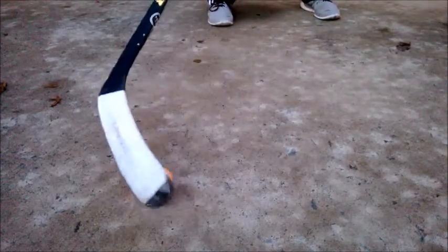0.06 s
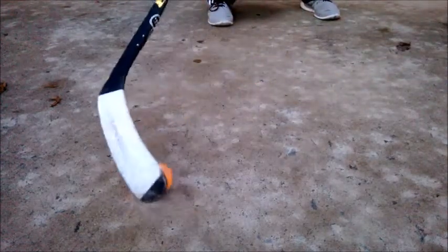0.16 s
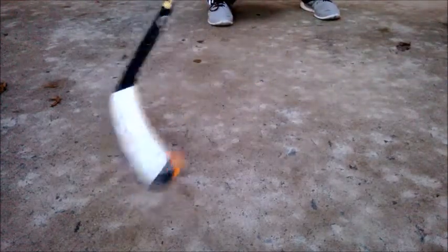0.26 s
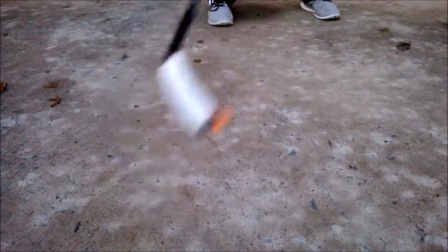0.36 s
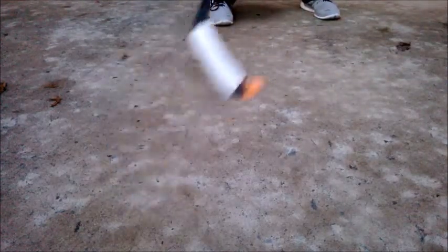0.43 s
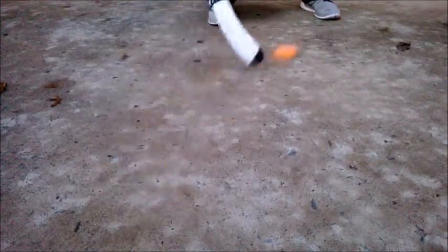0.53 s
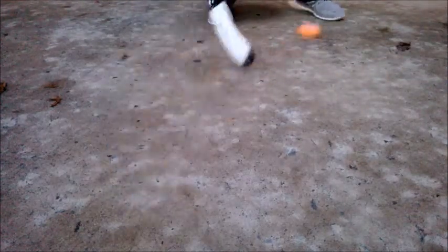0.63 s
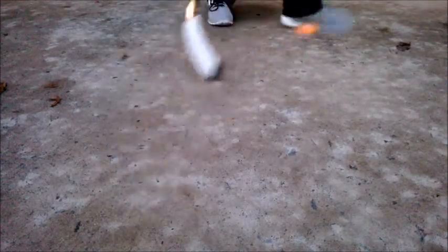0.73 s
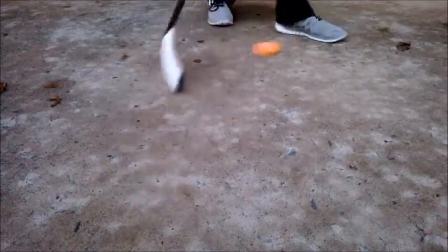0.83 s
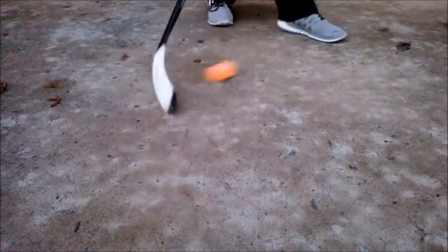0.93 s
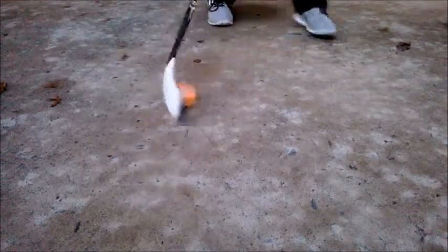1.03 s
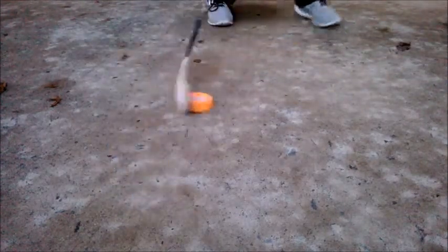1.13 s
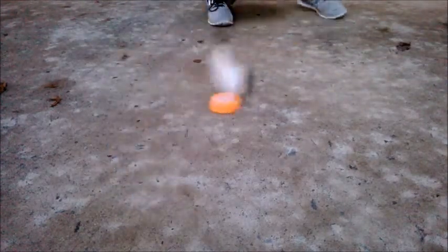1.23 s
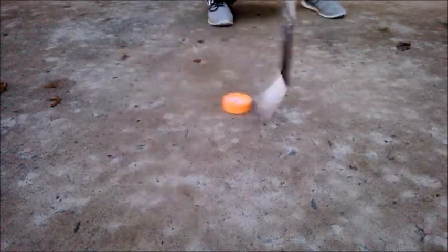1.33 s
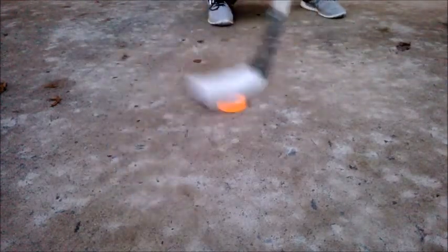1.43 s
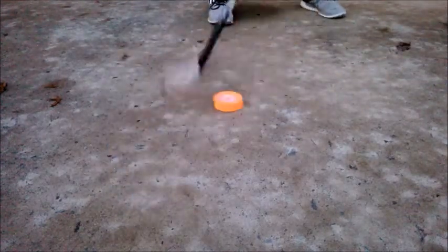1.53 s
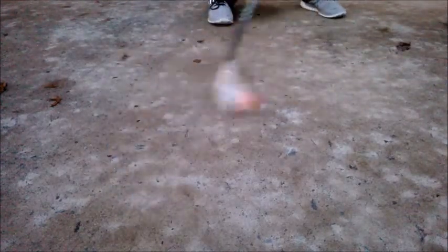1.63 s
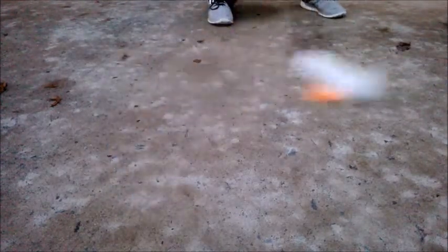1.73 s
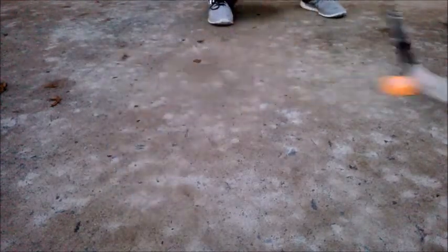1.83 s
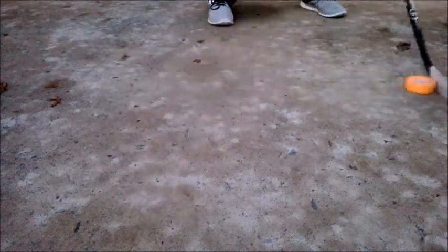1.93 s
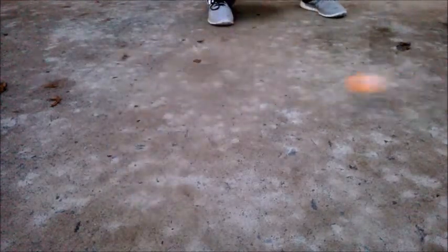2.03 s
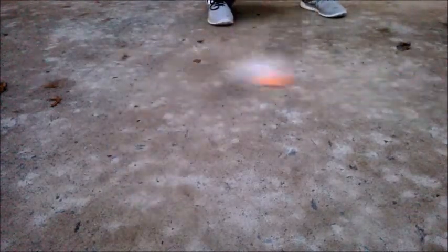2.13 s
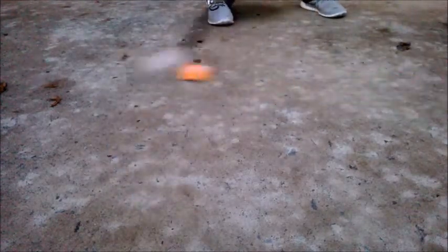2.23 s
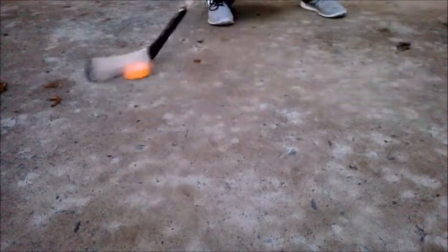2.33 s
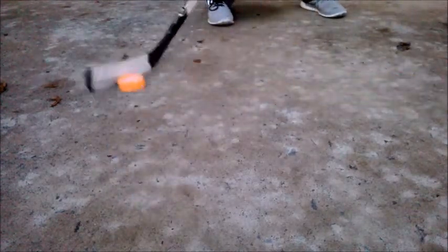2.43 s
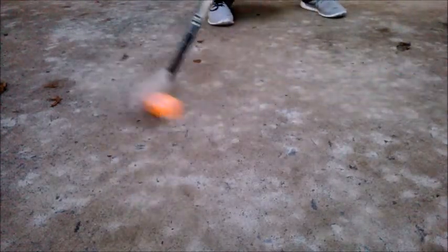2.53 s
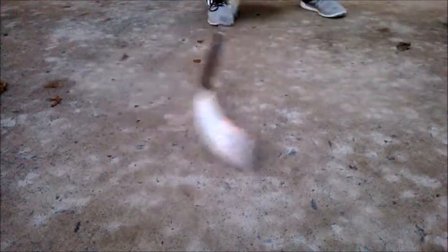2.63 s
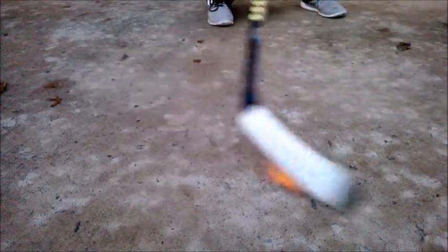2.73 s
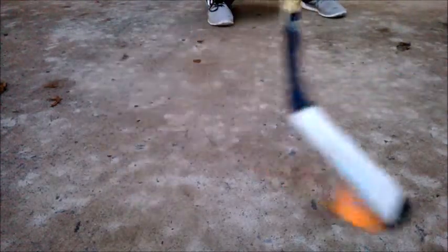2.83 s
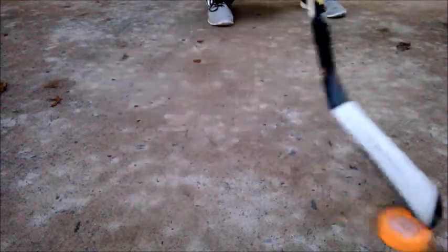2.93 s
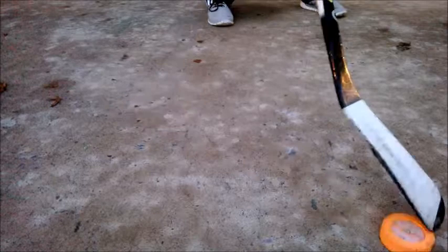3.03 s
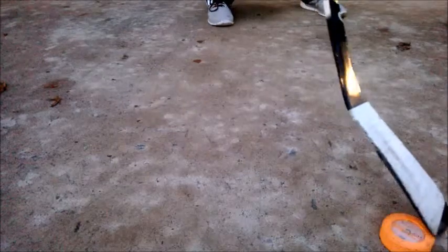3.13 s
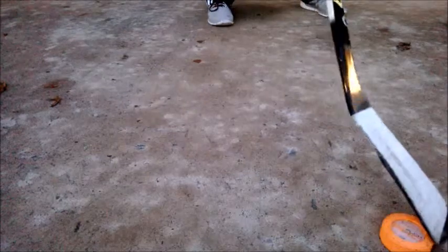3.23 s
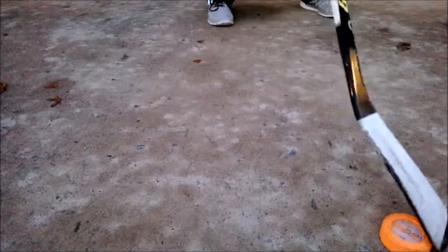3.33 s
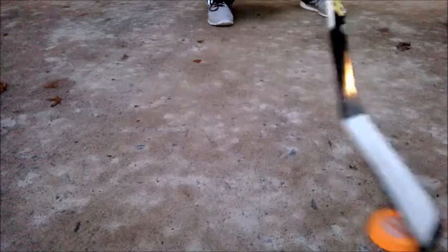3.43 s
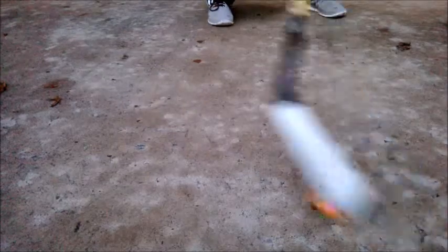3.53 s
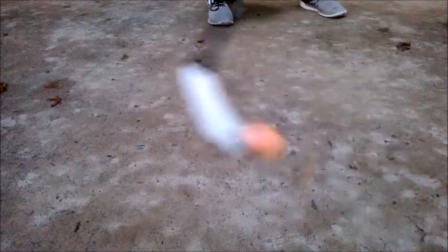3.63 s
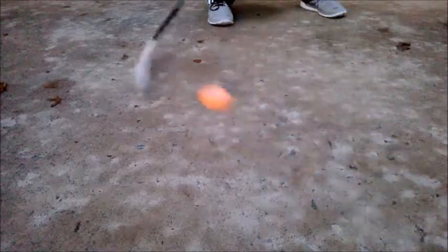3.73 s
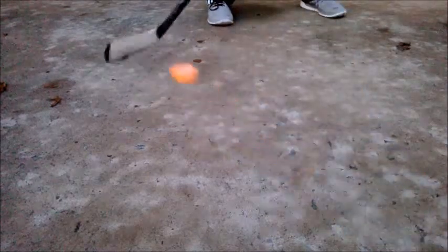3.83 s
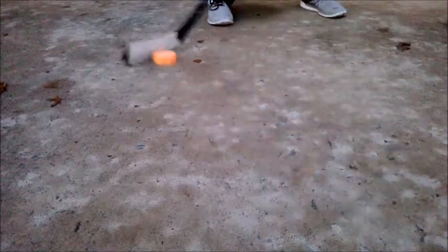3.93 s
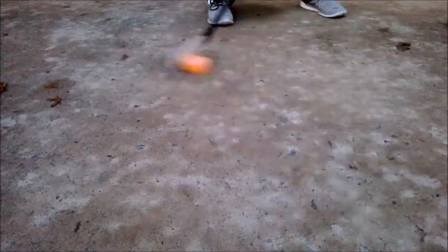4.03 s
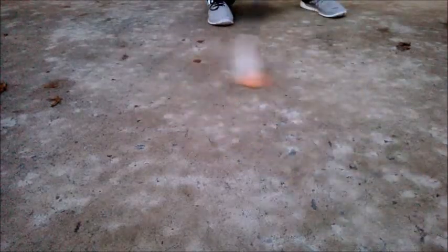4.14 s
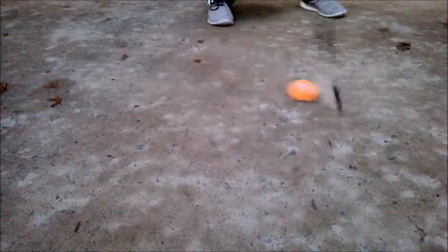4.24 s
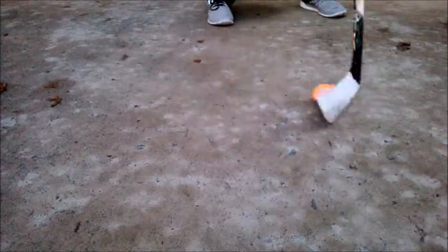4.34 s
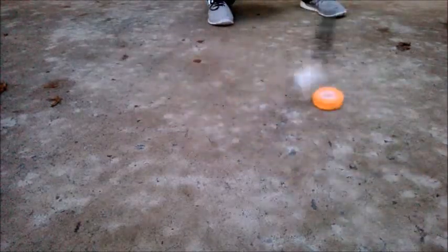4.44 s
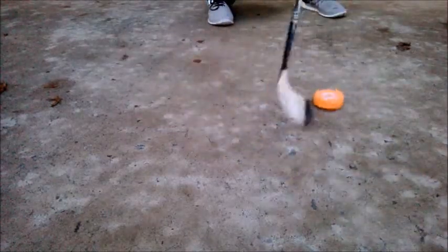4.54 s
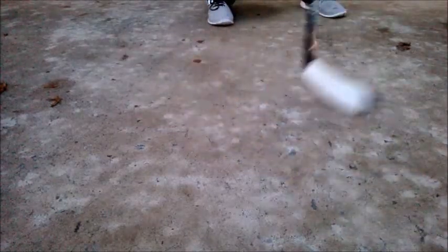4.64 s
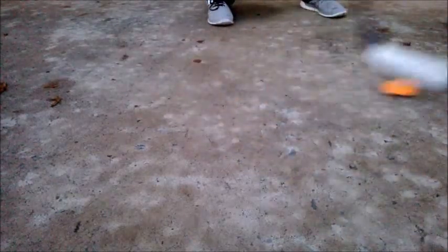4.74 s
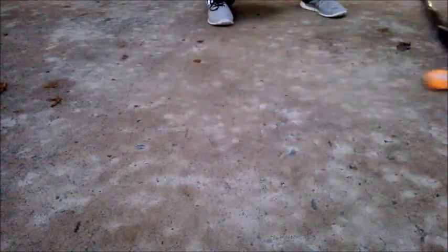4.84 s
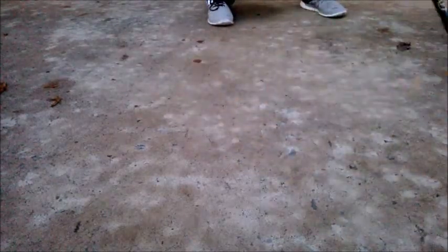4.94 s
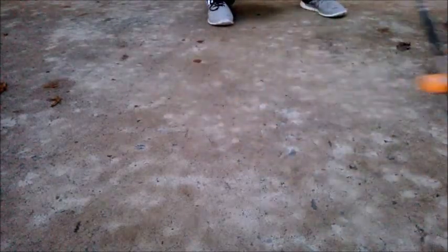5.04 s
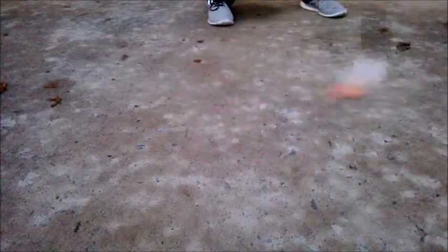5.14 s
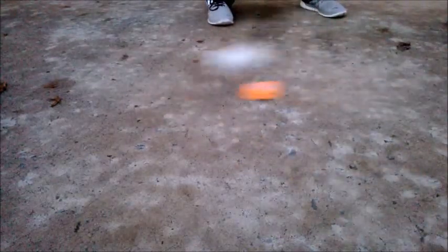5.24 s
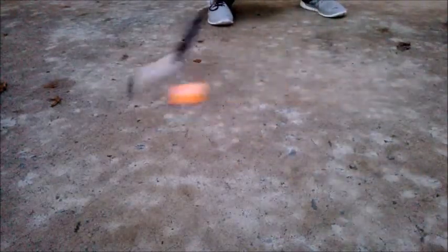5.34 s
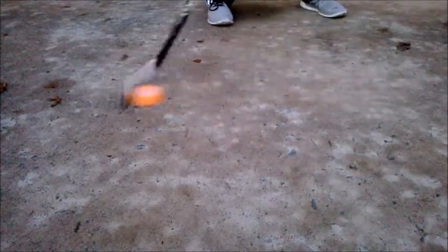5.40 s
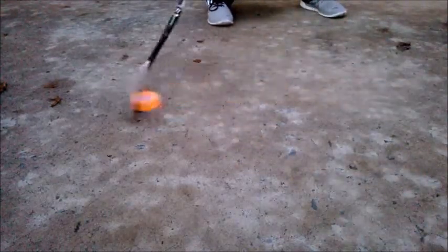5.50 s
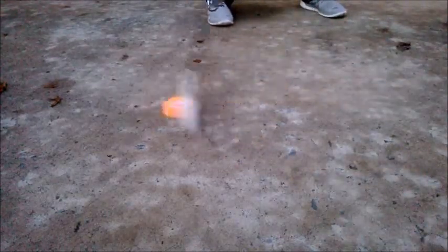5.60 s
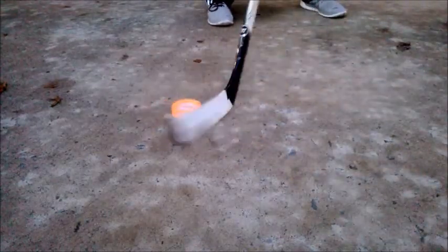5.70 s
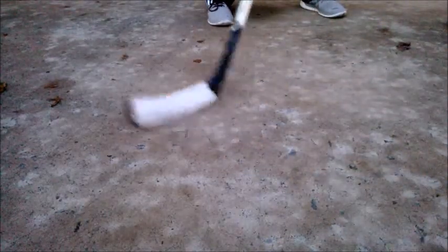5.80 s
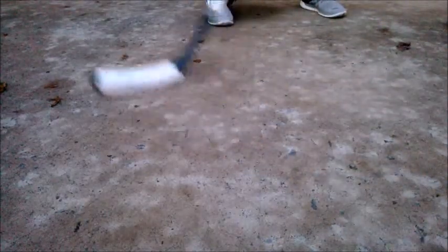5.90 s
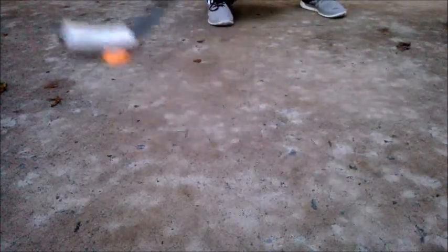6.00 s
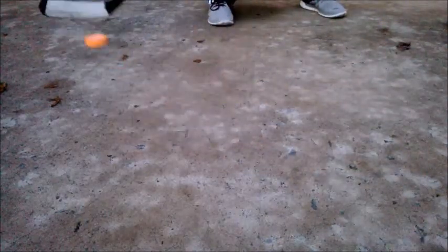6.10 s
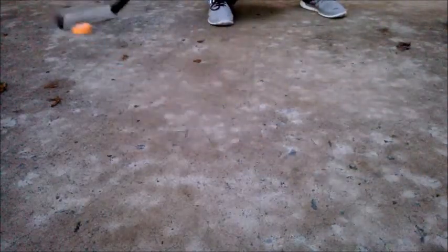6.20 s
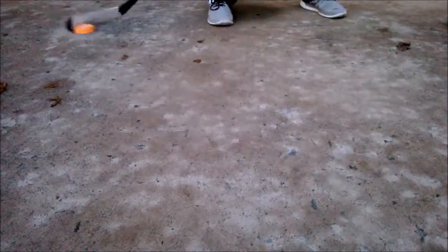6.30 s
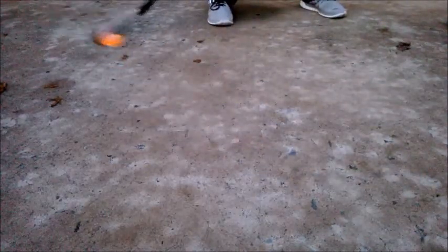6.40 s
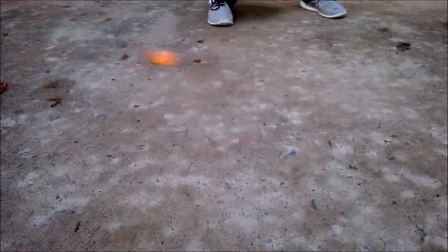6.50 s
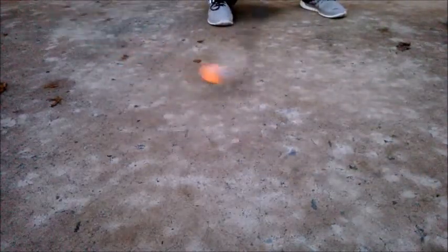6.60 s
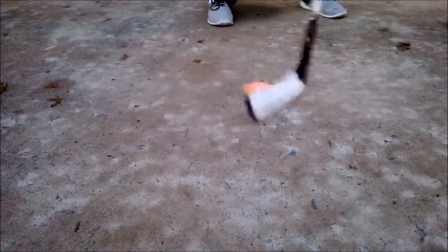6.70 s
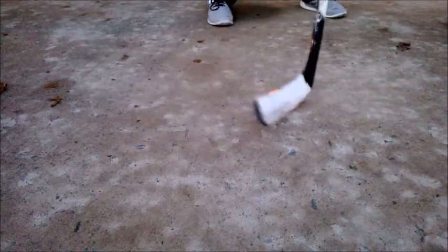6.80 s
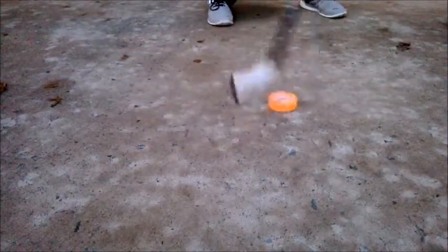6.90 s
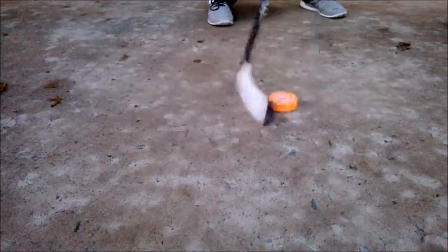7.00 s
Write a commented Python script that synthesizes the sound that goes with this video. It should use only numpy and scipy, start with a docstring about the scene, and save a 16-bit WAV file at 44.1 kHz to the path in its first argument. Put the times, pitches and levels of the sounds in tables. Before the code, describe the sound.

A hockey stick handles a hollow plastic puck on concrete for about seven seconds, heard close up in a bare, echoing room. It opens with soft scrapes, light puck taps and one shoe landing at 0.8 seconds. From 1 second, sharp clacks come in quick, uneven clusters, loudest around 1.4 and 1.7 seconds. The blade rasps over grit, sometimes with a tiny squeak, and between hits the puck slides and wobbles on its rim. From about 3 to 3.5 seconds the action pauses, leaving a very faint rising tone, with small, bright sand crunches on either side. Clacking resumes at 3.7 seconds, with strong hits near 4, 4.7, 5.5 and 6.3 seconds and a last cluster around 6.8. Thin, birdlike chirps recur faintly in the distance over a quiet, steady room noise and low rumble.

```python
"""Stickhandling on concrete

A stick works a hollow plastic puck over a concrete floor, close up in a bare, echoing room. The blade
clacks, shudders and scrapes over grit; between blows the puck slides, crunches sand and wobbles on its
rim. Brief wavering tones flick by, and a faint one rises midway. A shoe lands once, and thin chirps
like a small bird's come from farther off. A limiter catches the loudest clacks."""
import sys
import numpy as np
from scipy import signal
from scipy.fft import rfft, irfft
from scipy.io import wavfile
from scipy.ndimage import uniform_filter1d, minimum_filter1d

SR = 44100
rng = np.random.default_rng(int(sys.argv[2]) if len(sys.argv) > 2 else 0)


def inscribe(sig):
    """Save sig as 16-bit PCM at rate SR to the path in sys.argv[1].

    A 1-D sig is mono; a 2-D sig holds one channel per row.
    Samples are clipped to [-1, 1] before scaling.
    """
    pcm = np.round(np.clip(np.atleast_2d(sig).T, -1, 1) * 32767)
    wavfile.write(sys.argv[1], SR, pcm.astype(np.int16))


N = 311346
TIME = np.arange(N) / SR
EQ_HZ = np.fft.rfftfreq(4096, 1 / SR)  # frequency grid of the tone filters

# Cue levels are relative within their layer. blade hits, plus one hard puck tap at 4.3027 s: t/s, level/dB,
# knock pitch/Hz, bass/dB, treble/dB, shudder/dB
BLOWS = [(0.5221, -17.5, 1070, -6, -0.5, -1), (1.0723, -23, 1160, 5, 10, 4.5),
         (1.0921, -12, 1440, -7.5, 4, 4), (1.157, -19.5, 1430, -10, 3, 4.5),
         (1.4153, 0, 1450, -4.5, -1, -1), (1.4689, -10, 1290, -1, -0.5, -1),
         (1.6269, -15, 1740, -2.5, -3.5, 3.5), (1.6301, -7.5, 3000, -26, 5.5, 1),
         (1.6907, 1.5, 1530, -8.5, 4.5, -11), (1.9021, -9, 1330, -3, -3, 6),
         (1.9045, -14, 1320, -13, -0.5, -4), (1.9365, -7.5, 1210, 3, -3.5, -11),
         (2.3354, -17.5, 970, 7, 19.5, -5), (2.3396, -10.5, 980, 2, 7, -5.5),
         (2.3485, -9, 960, -2, -23, -14), (2.4001, -5, 1320, -3, -20, -16),
         (2.4506, -20.5, 1090, 6, -8, -6), (2.505, -21, 905, 19.5, -7, -7), (2.515, -21.5, 1160, 3, 35, -8),
         (2.568, -18.5, 1420, -3, 8.5, -5), (2.8209, -19, 1460, 10.5, 8.5, -1),
         (3.698, -19, 1340, -11, -1, 4), (3.7027, -11, 1170, 3.5, 16, 2), (3.7247, -15, 980, 5, -24, -1),
         (3.7523, -16, 1090, -16, -16, 3), (3.773, -21, 1100, -24, -4, 7.5), (3.959, -21, 1010, 4, -17, -8),
         (4.016, -7.5, 1130, -5.5, 0, -4), (4.0412, -2, 1080, -13, 0.5, -6),
         (4.3027, -13, 1760, -3.5, -1.5, 0), (4.3498, -17, 1710, 4.5, 2.5, 4),
         (4.384, -11, 1340, -4.5, -11, -9), (4.6047, -14.5, 916, -3, -3.5, 5.5),
         (4.6086, -6.5, 910, -1, 0.5, -8), (4.6419, -20, 1380, 15, 29, 2.5),
         (4.677, -1.5, 1270, -7.5, 0.5, -9), (4.9679, -14, 1250, 1.5, 0.5, 4.5),
         (5.0191, -7.5, 1005, 3, -17, -4), (5.1041, -15.5, 1700, -1, 0, -7),
         (5.1235, -15, 1680, -2, 12.5, 1), (5.434, -27, 1540, -12, -20, 10),
         (5.44, -16.5, 1150, -6.5, -11.5, 6.5), (5.4813, -4.5, 1460, -2.5, 1.5, -3.5),
         (5.7941, -15, 1400, 2, -13.5, 0), (5.8533, -21, 1210, 3, -1, -13),
         (5.869, -8, 1440, -4.5, -11.5, -1.5), (5.9328, -16, 1130, 0, -22, -10),
         (6.3104, -9, 1750, 6, -1.5, -2.5), (6.339, -6, 910, -2, -1.5, -10),
         (6.406, -15, 1660, 7.5, 6, 0.5), (6.4178, -17.5, 1160, 7, 9, 1.5),
         (6.4561, -16.5, 950, 5.5, 4, -19), (6.6886, -20.5, 1670, -9, 15, 4),
         (6.692, -22, 1500, 3.5, -7, 5), (6.6978, -14, 1360, -15, 2, -7), (6.772, -7.5, 1360, -2, 2, -2.5),
         (6.84, -9.5, 830, 0.5, -38, -3.5)]
# tone of a knock: f/Hz, level/dB
KNOCK_EQ = [(40, -18.5), (120, -16), (300, -7), (700, -1), (1400, -0.5), (2100, -4), (2900, -10),
            (4500, -17.5), (6500, -28.5), (8500, -31.5), (11000, -48), (15000, -62.5)]
# blade resonances: f/Hz, width/Hz, level/dB
BLADE_MODES = [(870, 69.5, -6.5), (1190, 52, -12.5), (1591, 69, -6.5), (2282, 132, -3.5), (3240, 240, -12),
               (4120, 49, -9), (4300, 85, -1), (5420, 78, -14.5), (5740, 190, 0)]
# single taps of the rim on the floor: t/s, level/dB, pitch/Hz, shell ring/dB
TAPS = [(0.479, -24, 1590, 9), (0.5876, -19.5, 1310, -4), (0.6639, -17, 2060, -5),
        (0.7447, -21.5, 1500, -11), (0.7839, -14.5, 1880, -6), (0.8167, -20.5, 1550, -5),
        (0.8626, -22.5, 2100, -8), (0.9399, -19.5, 1120, -5), (1.0526, -23, 1620, 0),
        (1.0632, -18.5, 2300, -5), (1.8336, -15, 1850, -7), (2.0464, -30, 1590, 0), (2.2283, -24, 1780, -1),
        (2.2913, -21.5, 1760, 3.5), (2.3084, -26, 2070, -6), (2.3811, -28, 1270, 11),
        (2.6579, -20.5, 1920, -4), (2.7042, -23.5, 1680, 0), (2.7917, -20, 1800, -6),
        (2.8404, -16.5, 1650, -12), (2.8925, -15, 1770, -22), (2.9356, -14, 1720, -17),
        (2.9688, -22, 1560, -9), (2.998, -25, 1580, 3), (3.5439, -22.5, 1456, 9), (3.575, -20, 1520, 5.5),
        (3.6148, -22.5, 1580, 2.5), (3.9415, -23, 1280, 7.5), (4.1472, -12.5, 1740, -22),
        (4.2053, -18, 1790, -14), (4.268, -27, 1840, -14), (4.84, -10.5, 1770, -12),
        (4.9515, -12, 2000, -21), (5.279, -18.5, 1770, -6), (5.3497, -19.5, 1930, 0),
        (5.7432, -19.5, 1790, -27), (6.543, -28.5, 1940, 5.5), (6.7989, -12.5, 1610, -2),
        (6.9158, -18.5, 1800, -24)]
# runs of rim taps: t/s, length/s, gap/s, level/dB, pitch/Hz, shell ring/dB
WOBBLES = [(1.262, .145, 0.034, -22, 1500, -20), (2.149, .04, 0.03, -23, 1650, -3),
           (2.758, .028, 0.011, -23.5, 1700, -11), (5.642, .085, .0345, -25.5, 1490, -13),
           (5.967, .075, 0.038, -24.5, 1660, -12), (6.111, .058, .039, -31.5, 1810, -24),
           (6.223, .078, 0.054, -26, 1670, -22), (6.61, .057, 0.037, -29, 1910, 5)]
# resonances of the puck's shell: f/Hz, width/Hz, level/dB
SHELL_MODES = [(3900, 204, -6), (5070, 600, -12), (7960, 143, -11), (10700, 700, -12)]
# blade scrapes: t/s, length/s, level/dB, swell from start to end/dB, treble/dB
DRAGS = [(0.0, 0.14, -34, -2.5, -14.5), (0.294, 0.1437, -29, 16.5, -32), (1.069, 0.053, -17.5, 3, -24),
         (1.155, 0.073, -24.5, -0.5, -15), (1.627, 0.064, -21.5, 13, -9), (1.706, 0.084, -28.5, -4, -8.5),
         (1.996, 0.048, -29, 18, -5.5), (2.344, 0.02, -17.5, -19, -2), (2.42, 0.097, -22, 13.5, -6.5),
         (2.525, 0.037, -36, -10, -6), (2.951, 0.063, -29.5, 4, -20), (3.546, 0.12, -30, 18, -40),
         (3.693, 0.13, -22, -12, 2.5), (3.82, 0.096, -20, -6, -6), (3.954, 0.049, -18, 7, -9.5),
         (4.026, 0.12, -28, -5, -2.5), (4.607, 0.061, -20, 2, -10.5), (5.047, .115, -25, -7, -5),
         (5.502, 0.13, -33.5, 0, -7.5), (5.812, 0.057, -22.5, 9, -14), (5.918, 0.073, -29.5, 8, -14.5),
         (6.341, 0.015, -19, -22, -8), (6.399, 0.065, -17.5, -1, -17.5)]
# tone of a scrape: f/Hz, level/dB
DRAG_EQ = [(60, -26), (200, -12), (450, 0), (1000, 3), (1600, 0), (2300, -9.5), (3000, -8), (4300, -15.5),
           (6500, -23.5), (9000, -24), (11500, -41), (15000, -50)]
# brief wavering tones: t/s, length/s, start pitch/Hz, end pitch/Hz, level/dB
BRIEF_TONES = [(2.332, 0.011, 4900, 5060, -23.5), (3.995, 0.016, 5240, 5240, -29.5),
               (4.301, 0.0047, 2053, 1890, -8), (4.315, 0.022, 1810, 2190, -24),
               (6.45, 0.026, 4500, 4250, -37), (6.453, 0.023, 5160, 5100, -40),
               (6.689, 0.024, 1288, 1245, -15.5), (6.69, 0.029, 2010, 2046, -19)]
# puck slides: t/s, length/s, level/dB, swell from start to end/dB
GLIDES = [(0.332, 0.38, -49, -6.5), (0.815, 0.071, -40.5, -10.5), (0.948, 0.096, -48.5, -29),
          (1.263, 0.09, -52.5, -5), (2.072, 0.24, -53, 5.5), (2.547, 0.25, -53, -17),
          (2.791, 0.26, -59.5, 8), (3.497, 0.24, -44, 2), (4.188, 0.098, -53.5, 4), (5.17, 0.22, -51, -7),
          (5.631, 0.15, -67, 8), (6, 0.33, -57.5, -14.5), (6.477, 0.24, -51.5, 1)]
# tone of a slide: f/Hz, level/dB
GLIDE_EQ = [(80, -26), (250, -4), (500, -1), (1100, -4), (1600, 4), (2100, -4.5), (2900, -15.5),
            (5300, -17), (6500, -17.5), (9000, -19.5), (12000, -38.5), (15000, -33.5)]
# close sand crunches: t/s, level/dB
CRUNCHES = [(3.047, -25), (3.453, -52.5), (3.53, -32), (3.544, -32), (3.575, -27.5), (3.614, -34),
            (3.704, -23.5), (3.727, -27), (6.036, -42), (6.224, -41), (6.407, -41)]
# tone of breaking sand: f/Hz, level/dB
SAND_EQ = [(1000, -41), (4000, -8), (6000, -6.5), (9000, 5), (12000, 0.5), (15500, -22)]
# tone of the shoe's slap: f/Hz, level/dB
SOLE_EQ = [(40, -17), (90, -1), (140, -2), (260, -5), (450, -13.5), (1500, -13), (5000, -29.5),
           (12000, -65)]
# distant chirps: t/s, level/dB, pitch shift/Hz
CHIRPS = [(.335, -45, -62), (0.946, -44.5, -55.5), (1.766, -43, -200), (2.95, -45, -100), (3.6, -49, -100),
          (4.345, -44.5, -150), (4.916, -44, -150), (5.401, -43, -200), (5.989, -47, -200)]
# arch of one chirp: t/s from its start, pitch/Hz, level/dB
CHIRP_CURVE = [(0, 4500, -27), (.018, 5300, -11), (0.032, 5700, -2), (0.053, 5480, 3.5),
               (0.076, 5200, -8.5)]
# faint rising tone: t/s, pitch/Hz, level/dB
RISING_TONE_CURVE = [(3.08, 1107, -87), (3.25, 1203, -63.5), (3.421, 1266, -69), (3.52, 1410, -47)]
# tone of the room's steady noise: f/Hz, level/dB
HISS_EQ = [(15, -15.5), (25, -12.5), (37, -19.5), (75, -5.5), (129, -12.5), (169, -20.5), (410, -21.5),
           (457, -30), (598, -20), (1110, -30), (1200, -26), (2010, -45.5), (5280, -41), (8810, -52),
           (15500, -41.5)]
# tone of the rumble under it: f/Hz, level/dB
RUMBLE_EQ = [(20, -11.5), (40, -3.5), (66, -2), (100, -11), (200, -14), (600, -64), (2000, -82)]
# early reflections: delay/s, linear gain
ECHOES = [(.0029, 0.019), (.0042, -0.031), (.0086, 0.017), (0.0114, -.14), (0.0136, 0.084)]
# reverb decay: f/Hz, t60/s
ROOM_T60 = [(100, 0.39), (400, 0.52), (1200, 0.52), (2800, 0.53), (7000, 0.52), (14000, 0.42)]
# reverb tone: f/Hz, level/dB
ROOM_EQ = [(60, 7.5), (300, 2.5), (800, -2), (1400, -1), (3000, 1), (5500, 2), (9000, -3), (15000, 9)]
# microphone response: f/Hz, level/dB
MIC_EQ = [(30, 0.5), (1000, 0), (2000, 0), (2900, -2.5), (4200, -0.5), (6000, -0.5), (9000, -1.5),
          (11500, -3), (13500, -7.5), (16000, -9)]


def blade_blows(knock_db=-1, shudder_db=-2, shudder_t60=0.03, bass_hz=600, treble_hz=2700):
    """Each blow is one sharp knock; then the flexing blade rattles against the floor and rings."""
    out, t = np.zeros(N), np.arange(len(EQ_HZ)) / SR
    for s, db, pitch_hz, bass_db, treble_db, rattle_db in BLOWS:
        bass = bass_db / (1 + (EQ_HZ / bass_hz) ** 4)
        treble = treble_db / (1 + (treble_hz / (EQ_HZ + 1)) ** 4)  # harder, shorter contact is brighter
        tone = read(KNOCK_EQ, EQ_HZ) + bass + treble
        knock = impulse(tone + peaks(boosted(BLADE_MODES, 2) + [(pitch_hz, 450, 4)]))
        # the blade flexes on near the knock's pitch, which depends on where it is struck
        ring = peaks(boosted(BLADE_MODES, 8) + [(pitch_hz, 130, 10)])
        rattle = grit(len(t), per_s=7000, spread_db=5.5) * amp(-60 * t / shudder_t60) * (t > 0.0008)
        shudder = unit_energy(equalise(rattle, tone + ring))
        blow = amp(knock_db) * knock + amp(rattle_db + shudder_db) * shudder
        add(out, s, 10.5 * amp(db) * blow)
    return out


def puck_taps(gain_db=7, rim_t60=0.009, face_hz=1080, thud_hz=520, contact_s=0.00058):
    """The puck bounces on its springy rim: a short ring, a dull thud, a hollow face, a bright shell."""
    out, t = np.zeros(N), np.arange(1500) / SR
    squeeze = 1 - np.exp(-(t / contact_s) ** 2)  # the plastic gives before it springs back
    face = ping(t, face_hz, db=-9, t60=0.0055)
    thud = ping(t, thud_hz, db=-9, t60=0.0058)
    shell = sum(amp(db) * np.sin(2 * np.pi * hz * t) * np.exp(-np.pi * width * t)
                for hz, width, db in boosted(SHELL_MODES, -7))
    for s, db, pitch_hz, shell_db in list(TAPS) + puck_wobbles():
        rim = ping(t, pitch_hz, db=0, t60=rim_t60)
        tap = amp(db + gain_db) * squeeze * (rim - face + thud + amp(shell_db) * shell)
        add(out, s, tap)
        lag, force = 0.5 + rng.random(2)
        add(out, s + 0.0043 * lag, amp(-11) * force * tap)  # the other edge comes down
    return out


def puck_wobbles(fade_db_per_s=30, scatter_db=1.8, scatter_octaves=0.069):
    """A rocking puck touches down at even gaps, tending softer. Returns cues laid out like TAPS."""
    cues = []
    for s, length, gap, db, pitch_hz, shell_db in WOBBLES:
        for age, (force, place) in zip(np.arange(0, length, gap), rng.standard_normal((8, 2))):
            tap_db = db - fade_db_per_s * age + scatter_db * force
            tap_hz = pitch_hz * 2 ** (scatter_octaves * place)
            cues.append((s + age, tap_db, tap_hz, shell_db))
    return cues


def blade_drags(gain_db=-6, treble_lift_db=11, split_hz=3000):
    """The blade's edge rasps over grit; a harder edge angle gives more treble."""
    tone = read(DRAG_EQ, EQ_HZ) + peaks(boosted(BLADE_MODES, 8))
    rasp = wander(equalise(grit(N, per_s=1600, spread_db=4), tone), depth_db=4)
    low = signal.sosfiltfilt(signal.butter(2, split_hz, fs=SR, output="sos"), rasp)
    out = np.zeros(N)
    for s, length, db, swell_db, treble_db in DRAGS:
        pressure = stroke(s, length, db, swell_db, attack_s=0.0073, release_s=0.015)
        out += pressure * (low + amp(treble_db + treble_lift_db) * (rasp - low))
    return amp(gain_db) * out


def brief_tones():
    """Brief wavering tones: at 3.995 s just a thin, high note near 5.2 kHz; the rest are stick-slip."""
    out = np.zeros(N)
    for s, length, start_hz, end_hz, db in BRIEF_TONES:
        hz = np.linspace(start_hz, end_hz, round(length * SR))
        envelope = np.sin(np.linspace(0, np.pi, len(hz)))
        add(out, s, amp(db) * envelope * fuzzy_tone(hz, waver_hz=98))
    return out


def puck_glides(gain_db=8, sizzle_db=-13, sizzle_hz=8150, sizzle_width_hz=850):
    """Grit ticks against the sliding puck and rings its shell; fine dust keeps one high mode sizzling."""
    tone = read(GLIDE_EQ, EQ_HZ) + peaks(boosted(SHELL_MODES, 18))
    ticks = wander(equalise(grit(N, per_s=3000, spread_db=7), tone), depth_db=6.5)
    high_mode = -20 * np.log10(1 + (2 * (EQ_HZ - sizzle_hz) / sizzle_width_hz) ** 2)
    sizzle = unit_rms(equalise(grit(N, per_s=420, spread_db=6.5), high_mode))
    envelope = sum(stroke(*cue, attack_s=0.017, release_s=0.018) for cue in GLIDES)
    return amp(gain_db) * envelope * (ticks + amp(sizzle_db) * sizzle)


def sand_crunches(t60=0.022):
    """Grains break under the puck in brief, bright bursts."""
    envelope, t = np.zeros(N), np.arange(3000) / SR
    for s, db in CRUNCHES:
        add(envelope, s, amp(db - 60 * t / t60))
    return equalise(envelope * grit(N, per_s=6000, spread_db=5), read(SAND_EQ, EQ_HZ))


def shoe_step(s=0.7625, gain_db=-19):
    """A shoe lands: a slap and a low thud of the sole."""
    out, t = np.zeros(N), np.arange(len(EQ_HZ)) / SR
    slap = impulse(read(SOLE_EQ, EQ_HZ))
    thud = ping(t, hz=240, db=-9, t60=0.044)
    add(out, s, amp(gain_db) * (5 * slap / abs(slap).max() + thud))
    return out


def distant_chirps():
    """Short, arched, birdlike whistles, all of one shape."""
    at, hz, db = np.transpose(CHIRP_CURVE)
    out, t = np.zeros(N), np.arange(0, at[-1], 1 / SR)
    envelope = amp(np.interp(t, at, db)) * signal.windows.tukey(len(t), 0.2)
    pitch = np.interp(t, at, hz)
    for s, level_db, shift_hz in CHIRPS:
        add(out, s, amp(level_db) * envelope * fuzzy_tone(pitch + shift_hz, waver_hz=125))
    return out


def faint_rising_tone(fade_s=0.013):
    """A faint, wavering tone rises from about 1.1 to 1.4 kHz."""
    s, hz, db = np.transpose(RISING_TONE_CURVE)
    fades = np.clip(np.minimum(TIME - s[0], s[-1] - TIME) / fade_s, 0, 1)
    return fades * amp(np.interp(TIME, s, db)) * fuzzy_tone(np.interp(TIME, s, hz), waver_hz=68)


def room_tone(hiss_db=-53, rumble_db=-52):
    """A bed of steady room noise over a low rumble."""
    hiss = unit_rms(equalise(rng.standard_normal(N), read(HISS_EQ, EQ_HZ)))
    rumble = unit_rms(equalise(rng.standard_normal(N), read(RUMBLE_EQ, EQ_HZ)))
    return amp(hiss_db) * hiss + amp(rumble_db) * rumble


def with_echoes(x):
    """The direct sound plus first reflections from the nearest surfaces."""
    out = x.copy()
    for s, gain in ECHOES:
        add(out, s, gain * x)
    return out


def reverb(x, build_up_s=0.0094, tails=3, drift_hz=1.33):
    """Dense reflections die band by band; crossfading tails stand for the stick moving about."""
    out, t = np.zeros(N), np.arange(SR) / SR
    onset = np.clip(t / build_up_s, 0, 1) ** 2
    for k in range(tails):
        hz, age, bands = signal.stft(grit(SR, per_s=4000, spread_db=2.5), SR, nperseg=256)
        decay = amp(read(ROOM_EQ, hz)[:, None] - 60 * age / read(ROOM_T60, hz)[:, None])
        tail = onset * signal.istft(bands * decay, SR, nperseg=256)[1][:SR]
        share = np.sqrt(2 / tails) * np.cos(np.pi * (drift_hz * TIME + k / tails))
        out += signal.oaconvolve(x * share, unit_energy(tail))[:N]
    return out


def grit(size, per_s, spread_db):
    """Sparse clicks of uneven size, like sand grains catching and letting go."""
    strength = amp(spread_db * np.minimum(rng.exponential(1, size), 4))
    return unit_rms(strength * rng.choice([-1, 1], size) * (rng.random(size) < per_s / SR))


def stroke(start, length, db, swell_db, attack_s, release_s):
    """Envelope of a sliding contact: it takes hold, swells or fades evenly, and lets go."""
    t = TIME - start
    fades = np.clip(t / attack_s, 0, 1) * np.clip(1 - (t - length) / release_s, 0, 1)
    return fades * amp(db + swell_db * (np.clip(t / length, 0, 1) - 0.5))


def wander(x, depth_db):
    """The contact point wanders, so resonances come and go. Returns RMS 1."""
    bands = signal.stft(x, SR, nperseg=512, noverlap=384)[2]
    patches = uniform_filter1d(rng.standard_normal(bands.shape), size=5, axis=0)
    patches = unit_rms(uniform_filter1d(patches, size=4, axis=1))
    return unit_rms(signal.istft(bands * amp(depth_db * patches), SR, nperseg=512, noverlap=384)[1][:N])


def fuzzy_tone(hz, waver_hz):
    """A tone that follows a pitch curve and wavers quickly about it."""
    lowpass = signal.butter(4, 400, fs=SR, output="sos")
    waver = unit_rms(signal.sosfilt(lowpass, rng.standard_normal(len(hz))))
    return np.sqrt(2) * np.sin(2 * np.pi * np.cumsum(hz + waver_hz * waver) / SR)


def ping(t, hz, db, t60):
    """One struck mode ringing out."""
    return np.sin(2 * np.pi * hz * t) * amp(db - 60 * t / t60)


def boosted(modes, gain_db):
    return [(hz, width, db + gain_db) for hz, width, db in modes]


def peaks(modes):
    """EQ curve in dB of resonances standing out of a flat response."""
    power = sum(amp(db) ** 2 / (1 + (2 * (EQ_HZ - hz) / width) ** 2) for hz, width, db in modes)
    return 10 * np.log10(1 + power)


def impulse(eq_db):
    """The tightest click of energy 1 with this EQ curve (minimum phase)."""
    log_gain = np.log(amp(np.r_[eq_db, eq_db[-2:0:-1]]))
    spectrum = np.exp(np.conj(signal.hilbert(log_gain)))
    return unit_energy(np.fft.ifft(spectrum).real[:len(eq_db)])


def equalise(x, eq_db):
    return signal.oaconvolve(x, impulse(eq_db))[:len(x)]


def read(points, hz):
    """Reads a table along a logarithmic frequency axis."""
    f, value = np.transpose(points)
    return np.interp(np.log(hz + 1), np.log(f + 1), value)


def add(mix, s, sound):
    part = mix[round(s * SR):][:len(sound)]
    part += sound[:len(part)]


def amp(db):
    return 10 ** (np.asarray(db) / 20)


def unit_rms(x):
    return x / np.sqrt(np.mean(x ** 2) + 1e-20)


def unit_energy(x):
    return x / np.sqrt(np.sum(x ** 2) + 1e-20)


def scene(clack_send_db=-2, scrape_send_db=-3, puck_send_db=-9, chirp_send_db=-4):
    """Mono mix: the action and chirps with their reverb sends, over the rising tone and room tone."""
    clacks = blade_blows()
    scrapes_and_tones = blade_drags() + brief_tones()
    puck_and_shoe = puck_taps() + puck_glides() + sand_crunches() + shoe_step()
    chirps = distant_chirps()
    send = (amp(clack_send_db) * clacks + amp(scrape_send_db) * scrapes_and_tones
            + amp(puck_send_db) * puck_and_shoe + amp(chirp_send_db) * chirps)
    close = with_echoes(clacks + scrapes_and_tones + puck_and_shoe)
    return (close + chirps + faint_rising_tone() + reverb(send) + room_tone())[None]


def record(dry, limiter_samples=31, cutoff_hz=16000):
    """The microphone dulls the top octave, a fast limiter holds peaks at full scale, a low-pass follows."""
    heard = irfft(rfft(dry) * amp(read(MIC_EQ, np.fft.rfftfreq(N, 1 / SR))), N)
    safe_gain = 1 / np.maximum(abs(heard), 1)
    gain = uniform_filter1d(minimum_filter1d(safe_gain, limiter_samples), limiter_samples)
    lowpass = signal.firwin(511, cutoff_hz, window=("kaiser", 9), fs=SR)
    return signal.oaconvolve(heard * gain, lowpass[None], "same")


dry = scene()
out = record(dry)
inscribe(out)
```